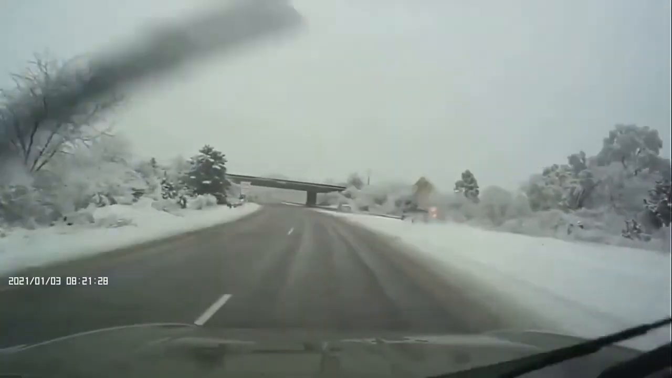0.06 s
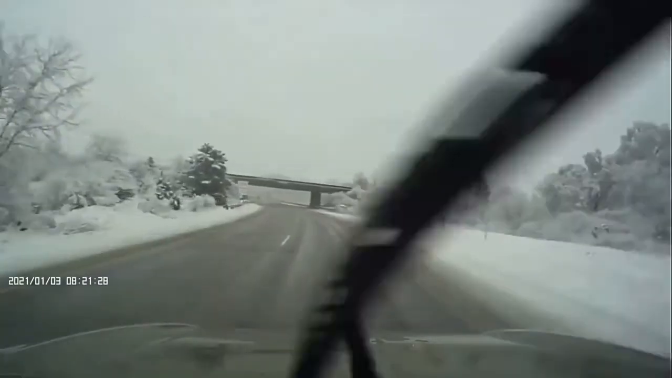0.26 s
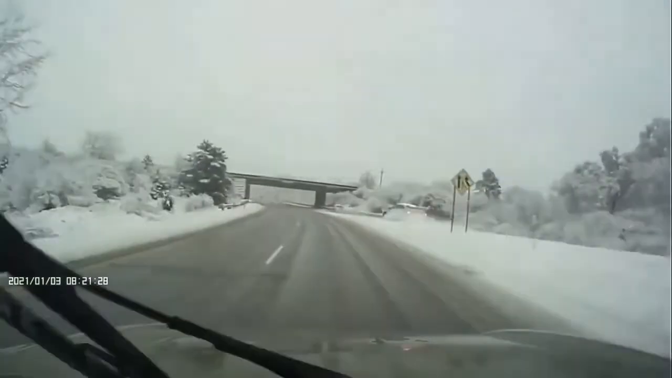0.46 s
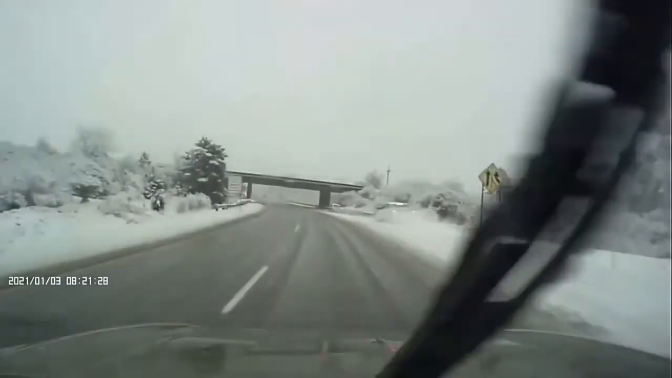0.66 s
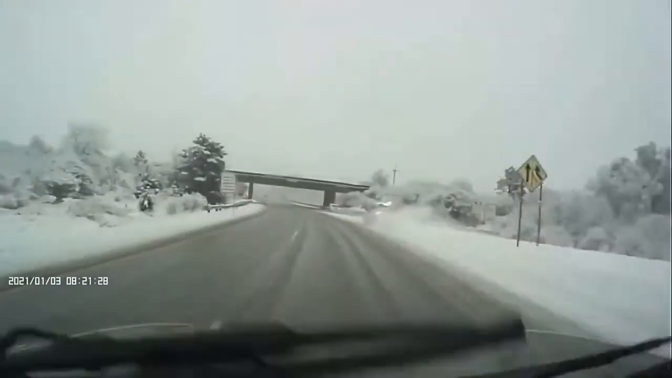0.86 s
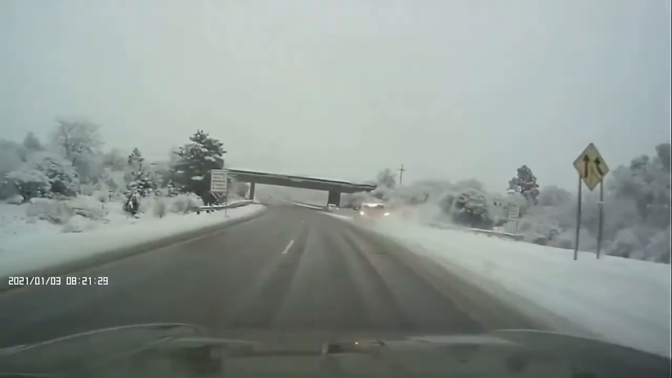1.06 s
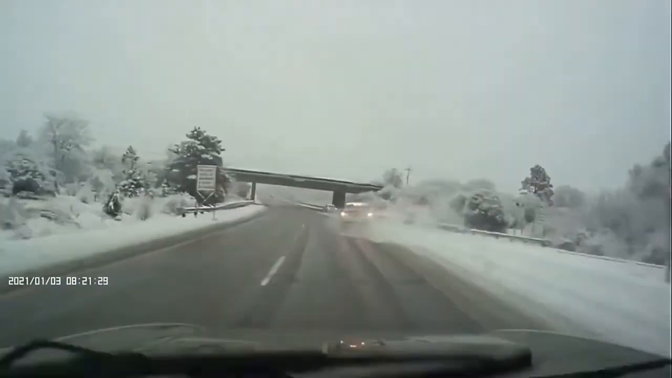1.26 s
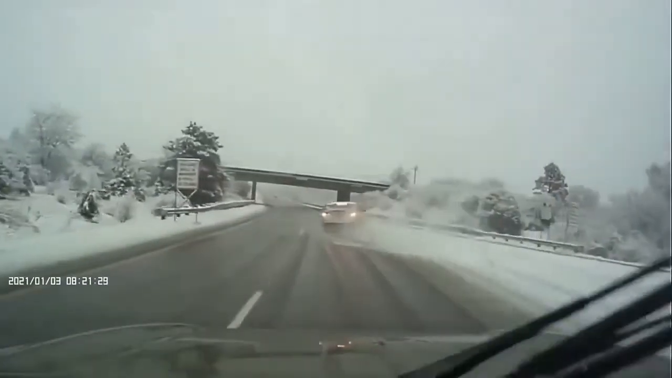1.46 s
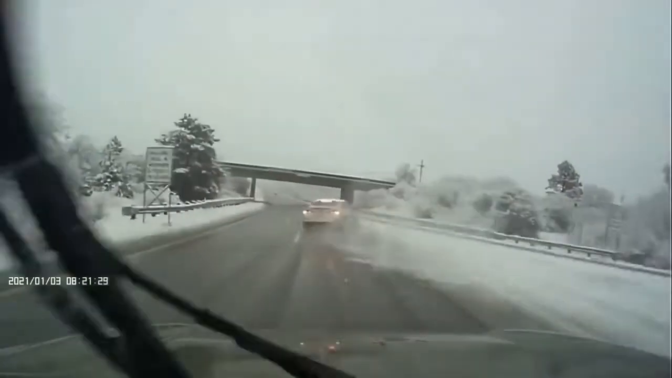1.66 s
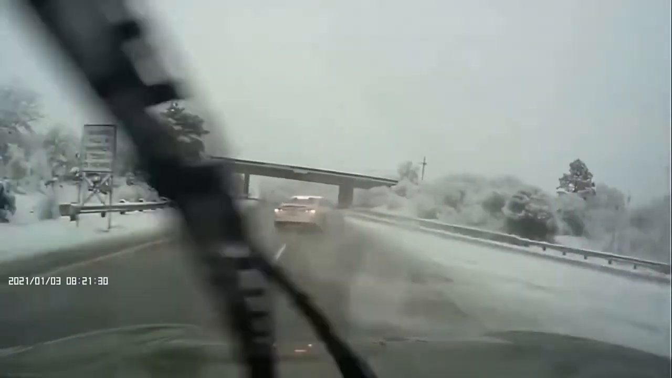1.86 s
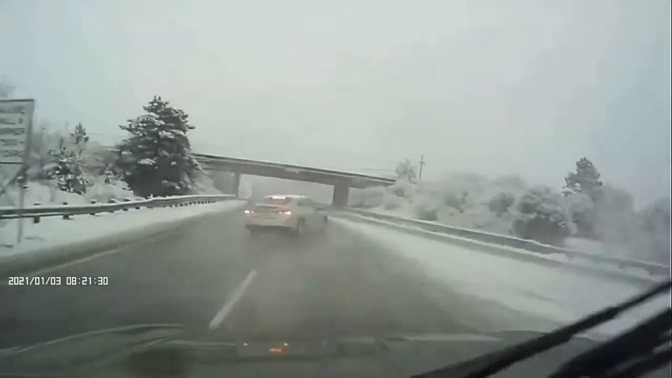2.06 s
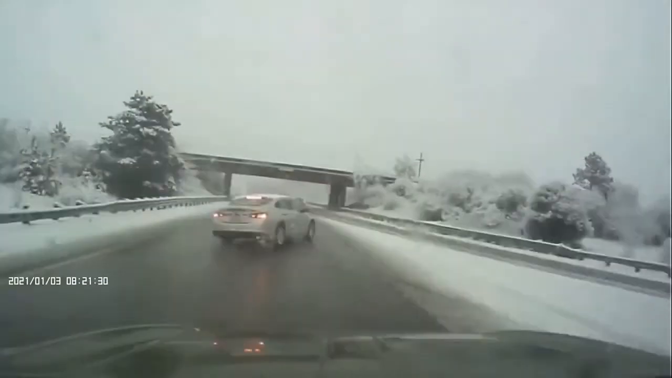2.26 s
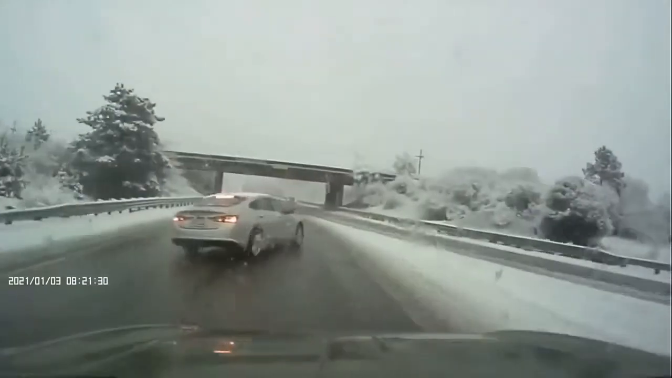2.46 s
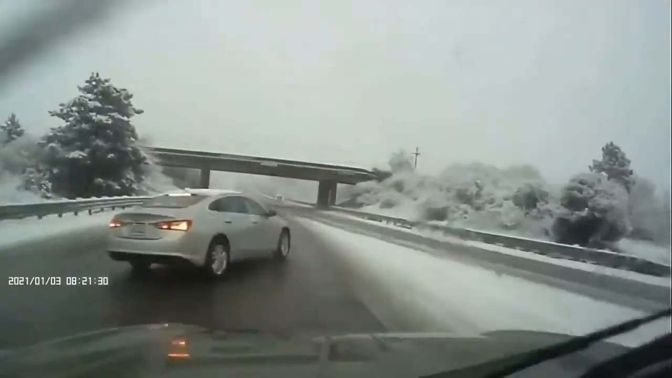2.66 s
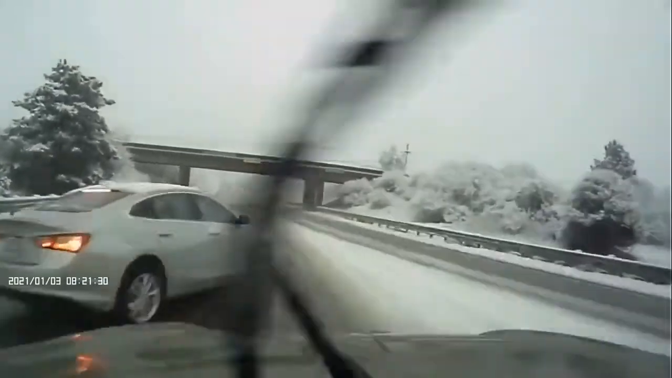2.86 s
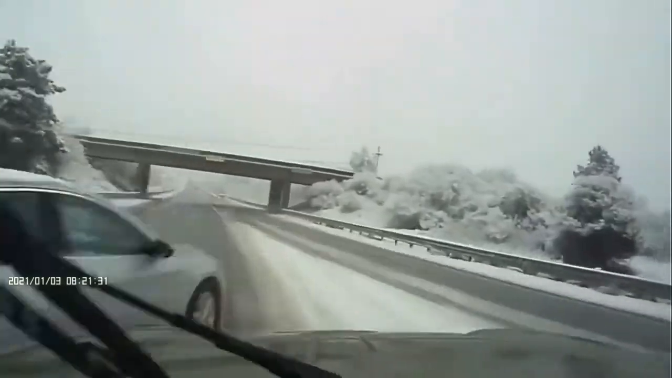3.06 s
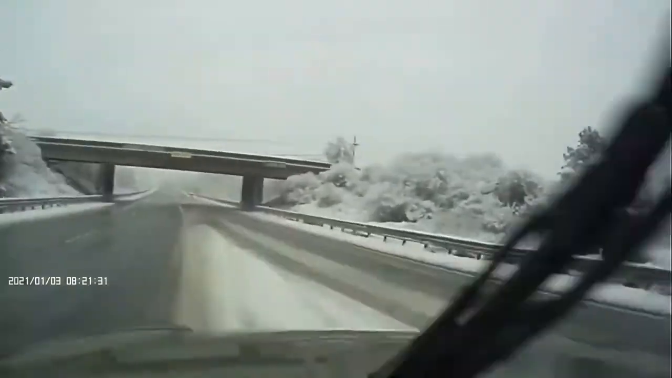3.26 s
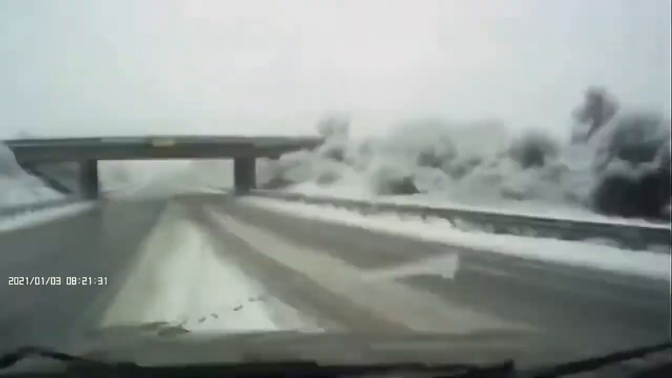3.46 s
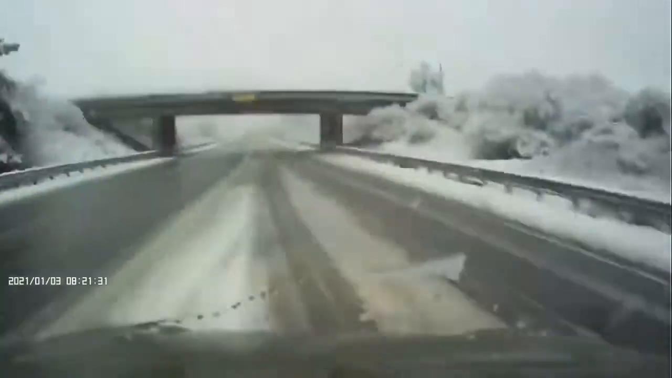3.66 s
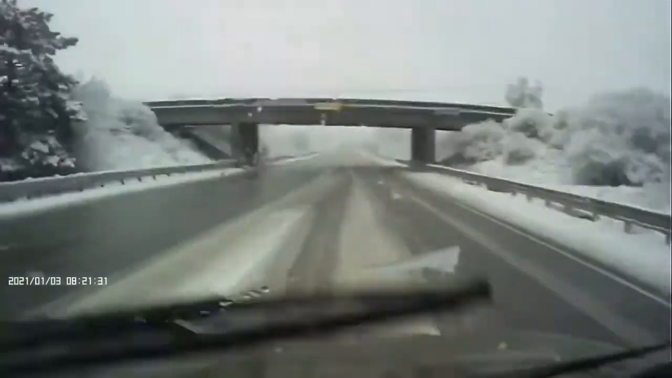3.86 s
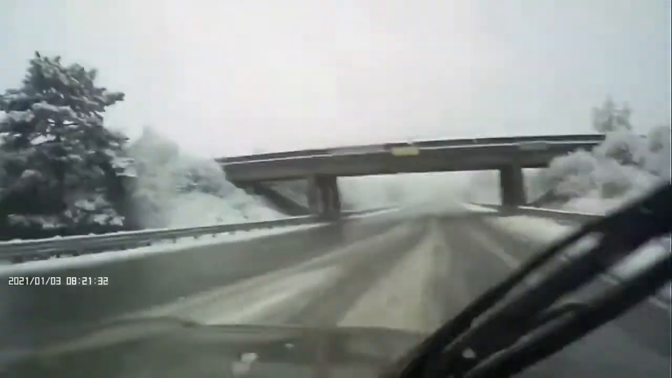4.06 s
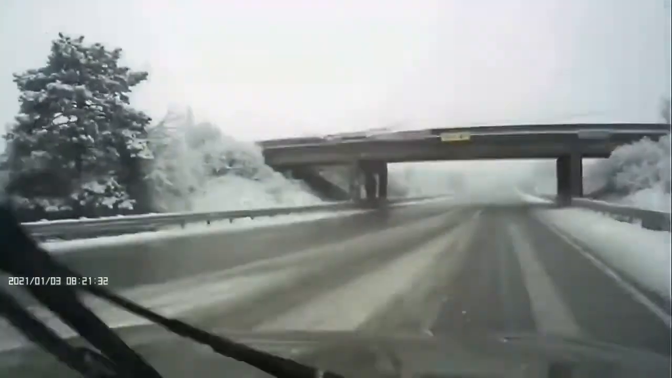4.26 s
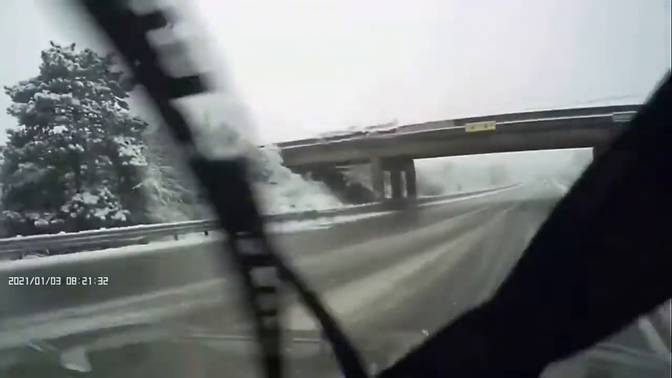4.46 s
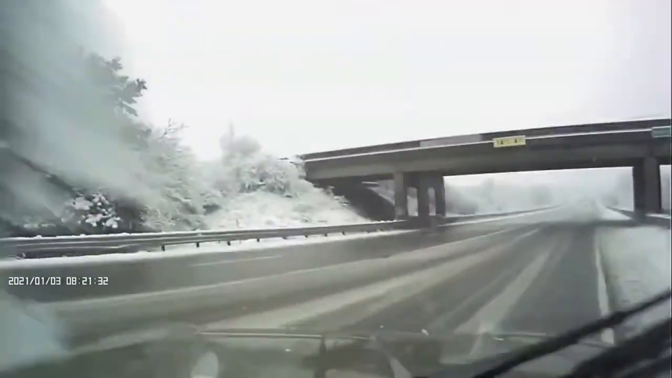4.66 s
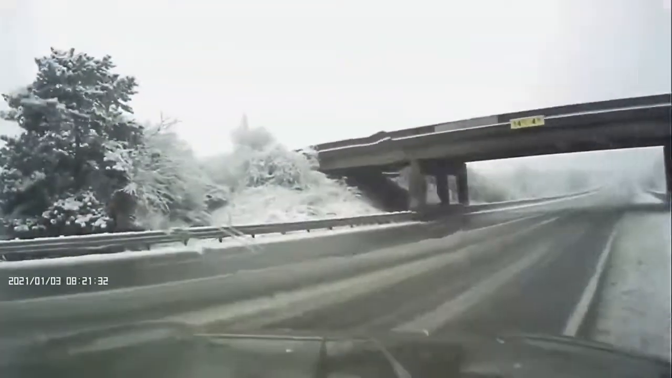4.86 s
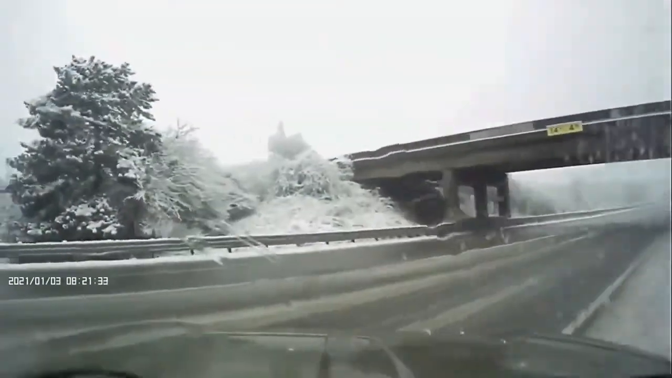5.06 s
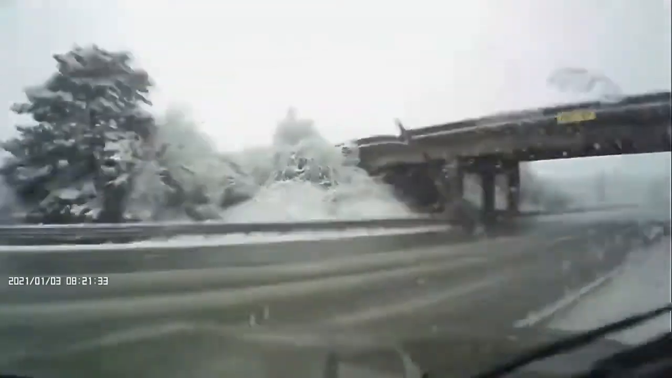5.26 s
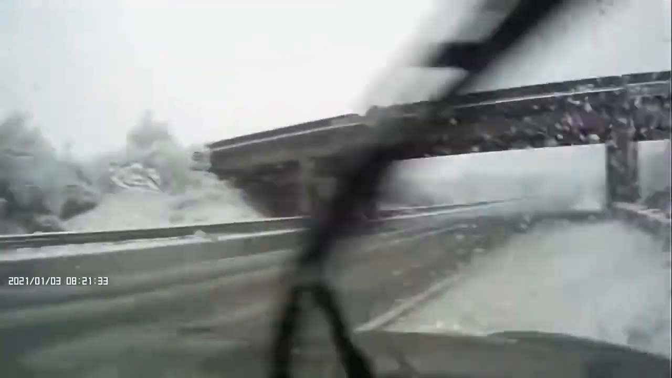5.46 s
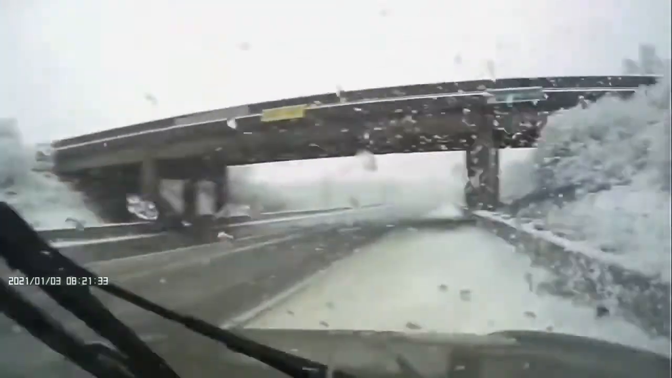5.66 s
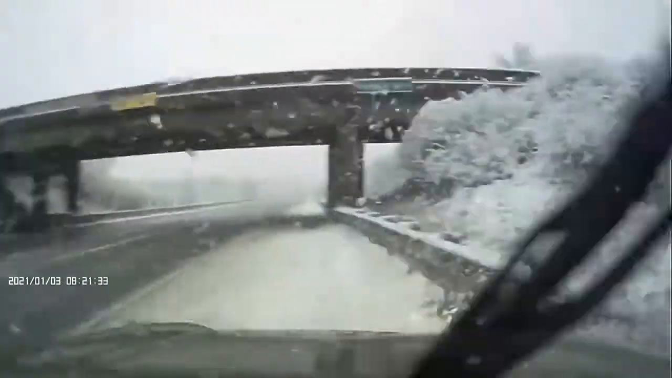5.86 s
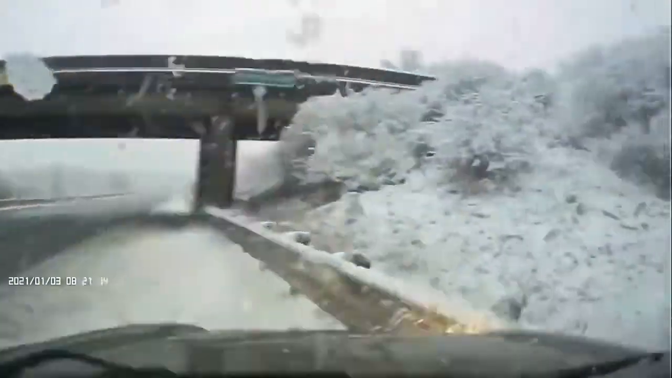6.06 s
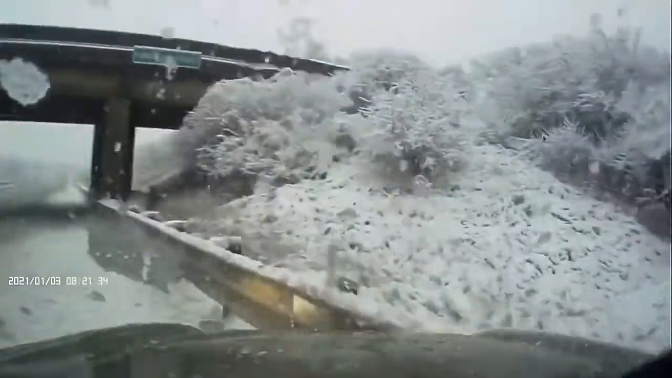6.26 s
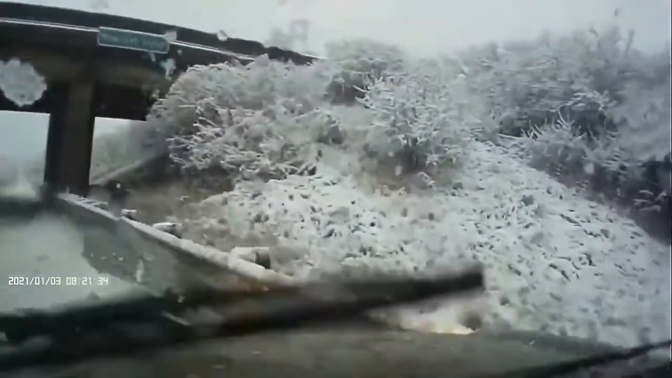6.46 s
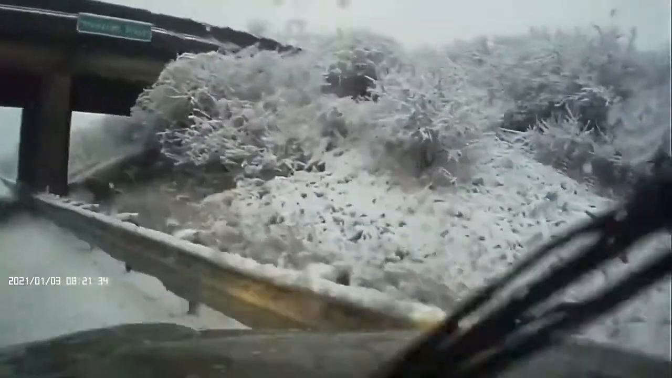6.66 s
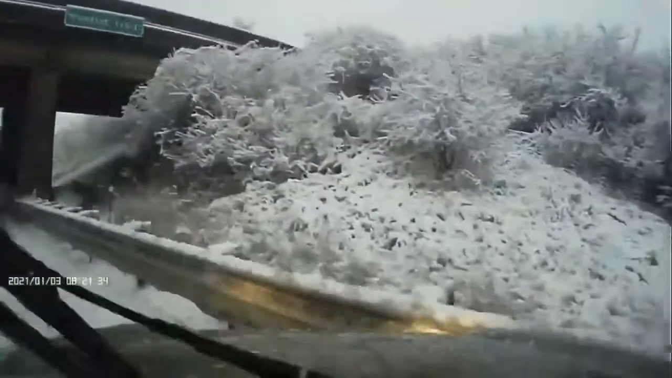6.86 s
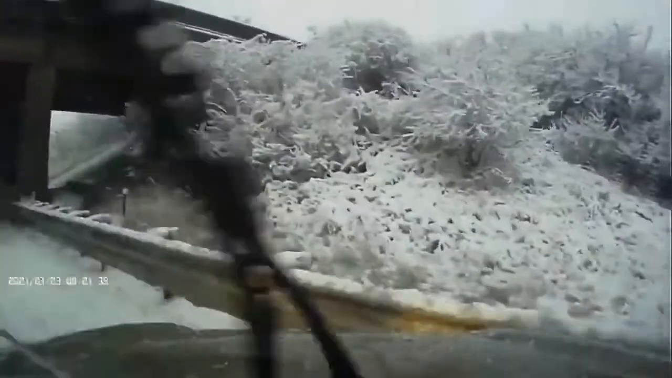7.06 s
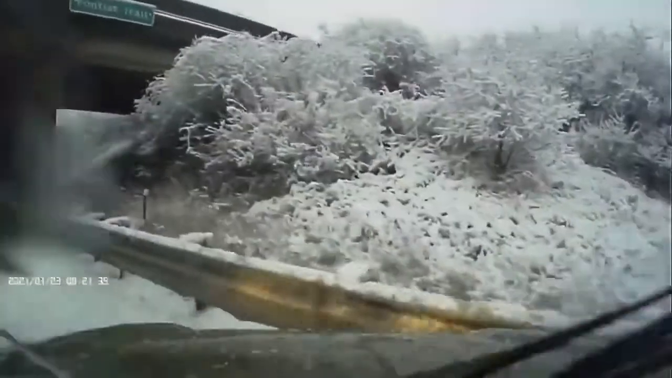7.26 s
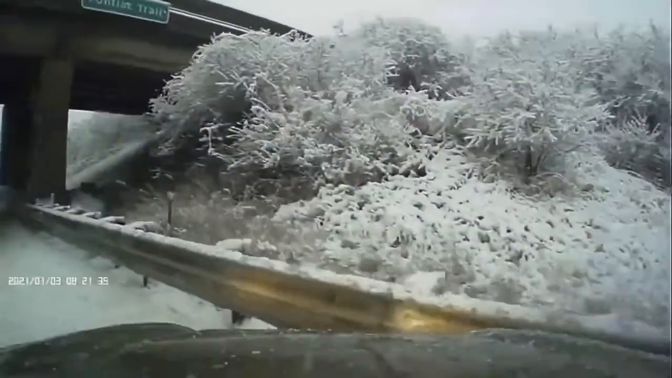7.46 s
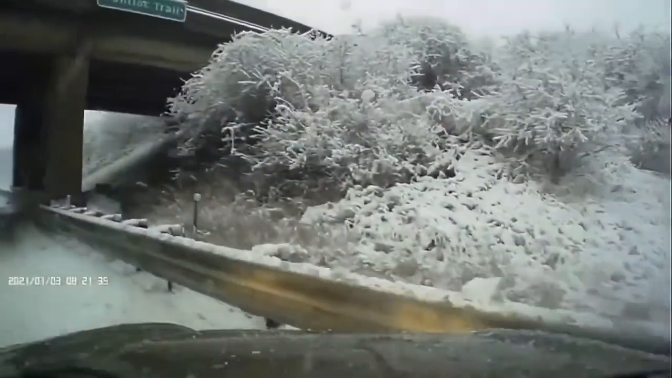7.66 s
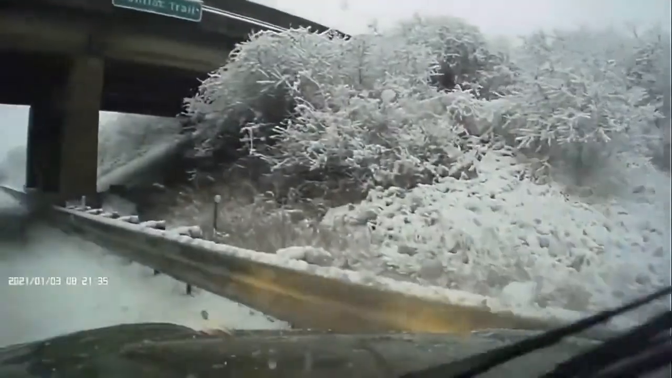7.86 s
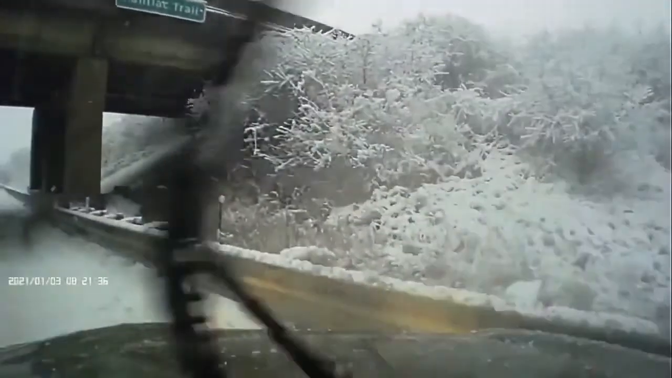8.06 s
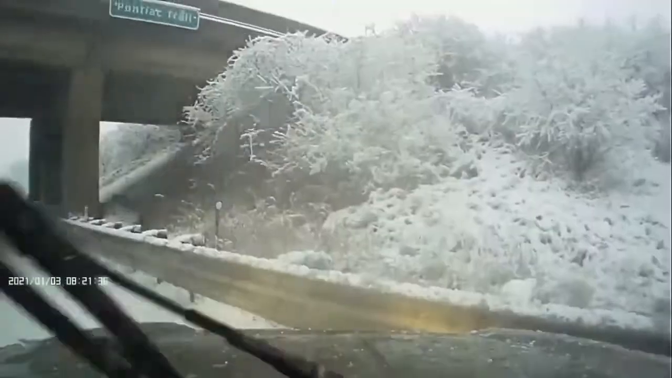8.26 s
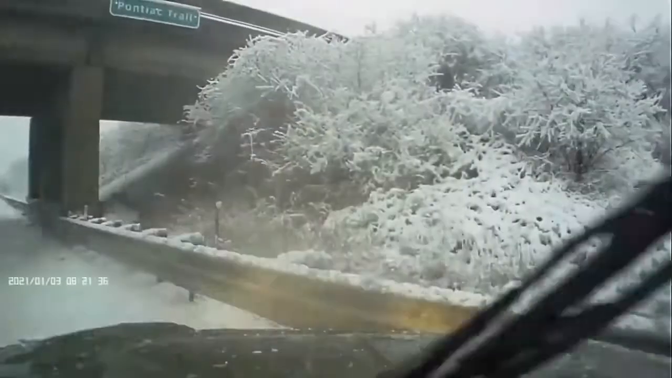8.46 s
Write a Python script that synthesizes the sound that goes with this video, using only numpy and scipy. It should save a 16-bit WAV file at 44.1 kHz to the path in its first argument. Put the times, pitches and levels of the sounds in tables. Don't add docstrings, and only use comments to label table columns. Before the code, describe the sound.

Steady muffled driving rumble breaks into a heavy distorted impact, grinding slide with loose rattles, second metal barrier crash, then near silence.

```python
import sys
import numpy as np
from scipy import signal
from scipy.fft import rfft, irfft, next_fast_len
from scipy.io import wavfile
from scipy.ndimage import uniform_filter1d, map_coordinates

SR = 44100
rng = np.random.default_rng(int(sys.argv[2]) if len(sys.argv) > 2 else 0)


def invert_db(x):
    u = np.asarray(x, float) / 20
    return 10 ** u


def bounce(signal):
    frames = np.transpose(np.atleast_2d(signal))
    limited = np.clip(frames, -1, 1)
    pcm = np.round(limited * 32767).astype(np.int16)
    wavfile.write(sys.argv[1], SR, pcm)


N = 375715

# start_s [s], sway_db [dB]
ROAD_SWAY = [(0.0, -30), (1.6, -31.5), (1.85, -28.5), (3.07, -34.5), (3.37, -29.5), (3.46, -37),
             (3.53, -15.5), (4.3, -16.5), (4.84, -27), (5.1, -24.5), (5.31, -25.5), (5.42, -13),
             (5.94, -32.5), (7.13, -27.5), (7.3, -32), (7.96, -29.5), (8.24, -42), (8.52, -49.5)]
# start_s [s], level_db [dB], pitch_hz [Hz], t60_s [s], sag_db [dB]
AIR_SHOVES = [(3.317, -11, 52, 0.28, -40), (3.519, -2.5, 60, .1, -29), (3.617, 9.5, 36.98, 0.68, 6.5),
              (3.806, -5.5, 38.9, 0.38, -30), (3.902, -4.5, 36.5, 0.42, -29), (4.035, -1, 42.6, 0.2, -9),
              (4.13, 3.5, 32.4, 0.14, -23.5), (4.29, 2, 34.5, 0.19, -29), (5.505, -10, 42, .25, -32),
              (5.582, -8, 44.9, .3, -29), (5.404, 2, 45.8, 0.19, -6), (6.686, -17, 64, .15, -50),
              (6.855, -19, 34.3, .2, -50), (7.092, -15, 36, .12, -50), (6.797, -19, 45, 0.088, -50),
              (7.145, -25, 68, .3, -50)]
# start_s [s], hold_s [s], level_db [dB], grit_db [dB re level], release [dB/s]
BODY_JOLTS = [(3.27, .01, -25.5, -4.5, 400), (3.501, 0.023, -20.5, -5, 202.5), (3.524, 0.13, -16, 0, 502),
              (3.688, 0.065, -16.5, 0, 202), (3.808, 0.012, -29, -6, 39), (4.089, 0.011, -17.5, -3.5, 229),
              (4.199, 0.35, -23.5, -3.5, 115.5), (4.692, 0.19, -26.5, -8, 68),
              (4.968, 0.031, -21, -18, 120), (5.136, 0.059, -35, -1, 97), (5.363, 0.042, -17.5, 2.5, 296),
              (5.454, 0.17, -27, 0, 118), (5.777, 0.029, -34, 2, 115), (6.193, 0.033, -27.5, -17, 172),
              (6.34, 0.076, -21, 0.5, 153), (6.533, 0.18, -39.5, -6.5, 47), (6.863, 0.17, -40.5, -3, 110),
              (7.252, 0.17, -51.5, 4, 86), (7.694, 0.028, -42, -22, 203)]
# start_s [s], drag_db [dB]
SNOW_DRAG = [(3.42, -42.5), (3.8, -37), (5.3, -49.5), (5.7, -34), (6.15, -44), (6.6, -43.5), (7.2, -49),
             (8.52, -50)]
# start_s [s], hold_s [s], level_db [dB], release [dB/s]
LOOSE_SHAKES = [(3.27, .012, -49, 700), (3.518, 0.25, -43.5, 500), (3.701, 0.02, -37, 497),
                (3.826, 0.035, -56, 42), (4.101, 0.02, -49, 400), (4.19, 0.13, -53.5, 202),
                (4.387, 0.16, -52, 292), (4.695, .09, -55, 403), (4.822, 0.04, -59.5, 200),
                (4.911, 0.12, -62.5, 146), (5.168, 0.068, -65.5, 102), (5.375, 0.028, -41, 500),
                (5.448, 0.084, -53.5, 46), (5.213, .022, -58.5, 502), (4.909, .015, -65, 500),
                (6.027, .018, -64, 400), (5.793, 0.027, -51.5, 135), (5.777, 0.01, -55, 112),
                (5.907, 0.02, -53, 350), (6.24, 0.0088, -72, 240), (6.37, 0.055, -52, 148),
                (6.498, 0.015, -55, 250), (6.547, 0.006, -40.5, 1500), (6.624, 0.33, -66.5, 83),
                (7.263, 0.049, -53.5, 500), (7.363, 0.031, -53.5, 218), (7.43, 0.045, -71.5, 38),
                (7.923, .02, -80, 120)]
# start_s [s], level_db [dB]
JINGLE_LEVEL = [(3.51, -67.5), (3.83, -60.5), (4.5, -68), (4.65, -75), (5.3, -78), (5.4, -73),
                (5.72, -61.5), (5.82, -52.5), (5.92, -80.5)]
JINGLE_MODES = [7500, 7900, 11100, 11700, 13800]
# start_s [s], peak_db [dB], thud_db [dB re
# peak], pitch_hz [Hz]
BODY_KNOCKS = [(3.273, -16, -20, 957), (3.516, -14, -9, 397), (3.537, -2.5, -6, 350),
               (3.564, -20, 6.5, 252), (3.679, -4, 16.5, 241), (3.702, 4.5, -2, 265),
               (3.736, -11, -18, 330), (3.759, -6.5, -1, 251), (3.814, -13.5, -13, 241),
               (3.864, -8, -23, 284), (3.946, -9.5, 10, 232), (4.021, -14.5, 8.5, 251),
               (4.099, -7, 2.5, 282), (4.203, -17, -6, 485), (4.27, -9, -5, 252), (4.293, -9.5, -8, 496),
               (4.326, -13.5, -10, 530), (4.379, -12, 8.5, 472), (4.489, -9.5, 7, 402),
               (4.52, -7.5, 1, 273), (4.559, -11, 4.5, 277), (4.636, -20, -12, 557),
               (4.708, -14.5, -3, 259), (4.749, -11.5, -9, 300), (4.777, -13, -3, 314),
               (4.837, -15.5, 0, 603), (4.938, -17, -16, 266), (4.985, -18.5, 15, 285),
               (5.142, -20, -14, 253),
               (5.374, -6.5, 0, 530), (5.388, 0.5, 0.5, 554), (5.432, -13, -12, 512),
                  (5.511, -7.5, 2.5, 572), (5.539, -9, -10, 252), (5.604, -9.5, -4, 399),
                  (5.697, -18.5, 0, 613), (5.787, -14.5, -20, 570), (5.897, -24.5, -13, 747),
                  (5.975, -28, -10, 230), (6.215, -43.5, 13, 231), (6.344, -20, -3, 525),
                  (6.379, -6.5, -5, 524), (6.417, -9.5, -12, 500), (6.933, -24, -15, 320),
                  (6.982, -21, -3, 273), (7.29, -24, -11, 964), (7.38, -30.5, -37, 923),
                  (7.682, -32, 5, 302), (7.741, -31.5, -12, 231), (7.92, -31.5, -14, 262)]
# start_s [s], peak_db [dB], pitch_hz [Hz]
PANEL_RAPS = [(3.558, -13, 736), (3.836, -23.5, 557), (3.865, -22, 840), (4.295, -13.5, 694),
              (4.323, -24, 530), (4.351, -21, 560), (4.435, -18.5, 498), (4.496, -12.5, 502),
              (4.827, -18, 463), (4.937, -21.5, 505), (5.064, -30, 495), (5.089, -27, 589),
              (5.433, -14, 580), (5.451, -11, 623), (5.488, -19, 620), (5.605, -16.5, 450),
              (6.298, -32, 738), (6.364, -14.5, 614), (6.404, -11, 883), (6.45, -21, 493), (6.55, -25, 795),
              (6.6, -36, 832), (6.799, -32.5, 764), (6.898, -31, 581), (7.188, -42, 630), (7.247, -36, 991),
              (7.265, -32, 937), (7.409, -28, 595)]
# pitch_hz [Hz], level_db [dB]
RAIL_MODES = [(1017, -25.5), (1174, -28.5), (2099, -39), (2422, -45), (3004, -45), (3400, -49), (3801, -48),
              (4124, -48), (4404, -43), (5150, -45), (5700, -46.5)]
# start_s [s], level_db [dB]
DOWNWARD_STEPS = [(3.634, -5), (3.651, 2), (3.6812, 0), (3.6872, 2), (3.7146, -3), (3.7402, 1), (3.7892, -6),
                  (4.0995, -4), (4.1073, 2), (4.2982, -12), (4.3272, -15), (4.4992, -11), (5.4152, -5),
                  (5.6092, -14), (5.9757, -16), (4.0412, -22), (3.9746, -22)]
# start_s [s], level_db [dB]
UPWARD_STEPS = [(3.6453, 2), (3.6763, 3), (3.6852, 4), (3.7272, -3), (3.7592, -1), (3.8092, -7), (4.1031, 0),
                (4.1206, -5)]
# start_s [s], level_db [dB], pitch_hz [Hz], t60_s [s], fall [octaves/s]
SPRING_TONES = [(4.094, 5, 116.2, .16, 0.5), (4.1197, -4, 116, 0.067, 1), (4.4, -13, 146, .15, -0.7),
                (4.988, -15, 480, 0.095, 1.5), (5.03, -13, 130, 0.065, 2), (4.018, -14.5, 744, 0.073, 0.5),
                (6.378, -7, 274.7, 0.202, -1), (6.412, -3, 270, 0.13, 0), (6.355, -15, 514, .12, -0.5),
                (3.273, -16.5, 340, 0.089, -2), (3.945, -7, 295, 0.1, 4), (6.985, -21, 490, 0.092, 19.5),
                (7.031, -11, 239, 0.064, 1), (7.515, -26, 362, 0.053, 12), (7.535, -39.5, 600, 0.27, .1),
                (7.625, -36, 605, 0.087, .1), (8.14, -40, 520, .08, .5), (8.46, -38, 330, 0.073, 0),
                (6.214, -19.5, 151, .12, .5), (6.56, -21, 250, .2, 1), (7.708, -19, 244, 0.095, 5.5),
                (8.08, -31.5, 758, 0.073, 0)]
# start_s [s], peak_db [dB], pitch_hz [Hz]
TRIM_TICKS = [(2.4, -45.5, 4190), (3.275, -36, 4270), (3.283, -44, 2840), (3.522, -29.5, 2610),
              (3.9086, -35, 4080), (3.926, -36.5, 2940), (4.1016, -31, 3020), (4.195, -40, 2610),
              (4.496, -34.5, 2590), (4.64, -47, 3130), (4.702, -39, 2870), (4.7454, -42.5, 2840),
              (5.159, -42, 4080), (5.1909, -36, 4220), (5.2152, -41, 3000), (5.371, -37, 3060),
              (5.5827, -36, 2930), (5.789, -43, 4430), (5.9114, -37, 2900), (6.0273, -43, 4750),
              (6.2325, -39.5, 4200), (6.387, -32.5, 4250), (6.549, -35, 2920), (6.899, -45, 2850),
              (6.897, -43, 1650), (6.985, -46, 1900), (7.95, -51, 2000), (6.36, -41, 3900),
              (7.34, -42.5, 4780), (7.369, -43, 2780), (7.406, -39, 2830), (7.639, -46.5, 2850),
              (7.954, -49, 2970),
              (4.113, -29.5, 2570), (4.3808, -39, 2220), (4.4517, -40, 2370), (4.5251, -36, 2570),
                  (4.6694, -52, 2370), (4.776, -44, 2220), (4.8284, -47, 2200), (4.8379, -44, 2380),
                  (4.8594, -48, 2750), (4.9177, -45.5, 4400), (4.9394, -47, 2350), (4.9876, -48, 4660),
                  (5.0305, -49, 2950), (5.1053, -56, 2240), (5.2274, -44, 2890), (5.4311, -37, 2210),
                  (5.5594, -42, 2950), (6.6278, -48, 2260), (6.6474, -53, 2290), (6.6824, -52, 2270),
                  (6.7264, -56, 2310), (6.7481, -54, 4670), (6.769, -53, 2220), (6.8319, -52, 3080),
                  (6.9326, -49, 2540), (6.9944, -57, 2250), (7.0399, -57, 2780), (7.0953, -55, 2230),
                  (7.2174, -57, 2590)]
# start_s [s], peak_db [dB]
GLASS_GRIT = [(.3681, -57), (1.4165, -49), (1.885, -46.5), (2.3106, -52), (2.6524, -56), (3.558, -28),
              (3.944, -31.5), (3.975, -34.5), (3.998, -51), (4.041, -35), (4.067, -38.5), (4.1658, -36),
              (4.097, -42), (4.287, -32.5), (4.298, -33), (4.314, -39), (4.376, -44.5), (4.414, -41),
              (4.55, -36), (5.1295, -46.5), (5.394, -25), (5.51, -40), (5.5327, -35.5), (5.8115, -44),
              (5.974, -38.5), (6.3437, -45.5), (7.1412, -51), (7.923, -54), (8.191, -53), (8.28, -50.5)]
# start_s [s], level_db [dB]
TRIM_CREAK = [
    (2.25, -83),
    (2.42, -69),
    (2.882, -86),
    (2.958, -72),
    (3.2, -77),
]
# start_s [s], hum_db [dB], roar_db [dB]
ROLLING = [
    (0.0, -34.5, -44),
    (3.25, -37, -46),
    (3.28, -29, -48),
    (3.32, -41, -43),
    (3.47, -39.5, -49.5),
    (3.5, -41, -47),
]
THIN_MOMENTS = [.18, .551, 1.225, 1.622, 1.645, 1.849, 1.991, 2.223, 2.456, 2.966, 3.132, 3.874, 3.897,
                4.153, 4.519, 4.986, 5.309, 5.477, 5.683, 6.147, 6.522, 5.575, 6.8, 6.82, 6.867, 6.983,
                7.076, 7.169, 8.423]

# pitch_hz [Hz], level_db [dB per Hz]
BOOM_SPECTRUM = [(12, -31), (25, -4.5), (38, -3.5), (55, -6), (75, -10), (100, -31.5), (200, -94.5),
                 (400, -120)]
FLOOR_SPECTRUM = [(50, -57), (85, 3), (120, 6), (160, 2), (200, -6), (300, -60.5), (800, -120)]
GRIND_SPECTRUM = [(120, -39.5), (200, 5.5), (270, 3.5), (350, -2.5), (450, -5.5), (650, -64.5),
                  (1500, -120)]
CRUNCH_SPECTRUM = [(300, -37.5), (480, 3), (650, 1), (900, -1), (1150, -13), (1500, -24.5), (2200, -35),
                   (3500, -54.5), (7000, -120)]
RATTLE_SPECTRUM = [(880, -17), (1500, 1), (2020, -5.5), (2520, -5), (2860, -0.5), (3400, -9), (4590, -5),
                   (5670, -10.5), (6610, -17), (7640, -14.5), (8660, -26.5), (14000, -27.5), (15000, -30.5)]
SNAP_SPECTRUM = [(4000, -74), (8000, 3.5), (10000, -2.5), (15500, -1.5), (17000, -64)]
CREAK_SPECTRUM = [(3000, -65), (3900, -17), (4200, -11), (4500, -18), (5500, -52.5), (9000, -120)]
HUM_SPECTRUM = [(140, -57.5), (200, -4.5), (235, -4), (270, 0.5), (310, -4), (350, -21.5), (450, -75),
                (900, -120)]
ROAR_SPECTRUM = [(210, -23.5), (360, -1.5), (423, -8.5), (493, -2), (596, -8), (786, -7.5), (1240, -25),
                 (1390, -26), (2150, -39.5), (3500, -50), (4550, -83), (7700, -120)]
HISS_SPECTRUM = [(1470, -27), (2500, 1.5), (5290, -2.5), (5580, -2.5), (6320, -3), (14200, -6.5),
                 (15300, -8), (15900, -22)]

JOLT_RISE_S, SHAKE_RISE_S = 0.014, 0.0022


def unit(x):
    return x / np.sqrt(np.mean(x ** 2) + 1e-20)


def curves(rows):
    s, *cols = np.transpose(rows)
    s = np.r_[s[0] - .1, s, s[-1] + .1]
    return [np.interp(np.arange(N) / SR, s, np.r_[-120, c, -120]) for c in cols]


def wobble(rate):
    knots = rng.standard_normal(int(N * rate / SR) + 4)
    return map_coordinates(knots, [np.arange(N) * rate / SR])


def coloured(x, spectrum):
    m, size = 2 ** 15, next_fast_len(N)
    f, v = np.transpose(spectrum)
    level_db = np.interp(np.log(np.fft.rfftfreq(m, 1 / SR) + 1), np.log(f + 1), v)
    cep = irfft(np.log(invert_db(level_db) + 1e-6), m)
    cep[1:m // 2] *= 2
    cep[m // 2 + 1:] = 0
    impulse = irfft(np.exp(rfft(cep)), m)
    return irfft(rfft(x, size) * rfft(impulse, size), size)[:N]


def noise(spectrum, lumps=0.):
    return unit(coloured(rng.standard_normal(N) * invert_db(lumps), spectrum))


def bursts(s, db, t60, attack):
    env, t = np.zeros(N + SR), np.arange(SR // 4) / SR
    shape = invert_db(-60 * t / t60) * (1 - np.exp(-t / attack))
    for at, level in zip(s, db):
        env[round(at * SR):][:len(t)] += invert_db(level) * shape
    return env[:N]


def rings(s, db, hz, t60, attack=1e-5):
    x, t = np.zeros(N + SR), np.arange(round(1.2 * t60 * SR)) / SR
    for at, level, pitch in zip(s, db, hz):
        envelope = invert_db(level - 60 * t / t60) * (1 - np.exp(-t / attack))
        x[round(at * SR):][:len(t)] += envelope * np.sin(2 * np.pi * pitch * t)
    return x[:N]


def swells(s, hold, db, release, rise):
    env, t = np.zeros(N + SR), np.arange(SR) / SR
    for at, held, level, fall in zip(s, hold, db, release):
        decay = invert_db(level - abs(fall) * np.maximum(t - held, 0))
        env[round(at * SR):][:SR] += decay * (1 - np.exp(-t / rise))
    return env[:N]


def cabin():
    sway_db, = curves(ROAD_SWAY)
    s, hold, db, grit_db, release = np.transpose(BODY_JOLTS)
    floor = invert_db(sway_db - 10) + swells(s, hold, db - 1, release, JOLT_RISE_S)
    boom = invert_db(sway_db + 1.7) * noise(BOOM_SPECTRUM, 0.42 * wobble(16))
    x = boom + floor * noise(FLOOR_SPECTRUM, 1.6 * wobble(15))
    t = np.arange(SR) / SR
    for s, db, hz, t60, sag_db in AIR_SHOVES:
        swing = invert_db(db - 60 * t / t60) * np.sin(2 * np.pi * hz * t) * (1 - np.exp(-t / 0.0075))
        sag = invert_db(sag_db) * t / 0.091 * np.exp(1 - t / 0.045)
        x[round(s * SR):][:SR] += swing - sag
    return x


def knocks():
    s, db, low_db, hz = np.transpose(BODY_KNOCKS)
    shake = bursts(s, db - 7.5, t60=0.057, attack=0.0005) * noise(CRUNCH_SPECTRUM)
    ring = rings(s, db - 2.5, hz, t60=0.064, attack=.0006)
    low = unit(noise(GRIND_SPECTRUM) + 1.48 * noise(FLOOR_SPECTRUM))
    return shake + ring + bursts(s, db + low_db - 1.5, t60=0.08, attack=0.0071) * low


def slide():
    drag_db, = curves(SNOW_DRAG)
    s, hold, db, grit_db, release = np.transpose(BODY_JOLTS)
    dig = invert_db(drag_db - 2.5) + swells(s, hold, db, release, JOLT_RISE_S)
    grit = invert_db(drag_db - 3.5) + swells(s, hold, db + grit_db, release, JOLT_RISE_S)
    shake = invert_db(drag_db - 30.0) + swells(*np.transpose(LOOSE_SHAKES), SHAKE_RISE_S)
    jerk = wobble(28)
    grind = noise(GRIND_SPECTRUM, 2.6 * jerk + 1.4 * wobble(40))
    crunch = noise(CRUNCH_SPECTRUM, 0.87 * jerk + 2.5 * wobble(90))
    rattle = noise(RATTLE_SPECTRUM, 0.37 * jerk + 2.3 * wobble(70) + 2.9 * wobble(300))
    jingling = invert_db(curves(JINGLE_LEVEL)[0] - 9.0) * jingle()
    return dig * grind + invert_db(-2.5) * grit * crunch + invert_db(0.5) * shake * rattle + jingling


def jingle():
    when, size, pitch = rng.random((260, 3)).T
    mode_hz = np.array(JINGLE_MODES)[(pitch * len(JINGLE_MODES)).astype(int)]
    part_hz = mode_hz * (1 + 0.3 * (.5 - when * 37 % 1))
    tones = unit(rings(3.0 + 3.1 * when, 16 * size, part_hz, t60=0.1))
    return tones * 1.14 + noise(SNAP_SPECTRUM, 4.9 * wobble(22) + 1.5 * wobble(400))


def clumps():
    s, hold, db, grit_db, release = np.transpose(BODY_JOLTS)
    grit = swells(s, hold, db + grit_db, release, JOLT_RISE_S)
    middle_hz, spread_octaves = 541, .33
    when, size, pitch = rng.random((800, 3)).T
    hz = middle_hz * 2. ** (spread_octaves * 4 * (pitch - .5))
    lumps = rings(3.2 + 4.6 * when, 9 * size, hz, t60=0.039, attack=.002)
    return invert_db(-5) * grit * unit(lumps)


def barrier():
    s, db, hz = np.transpose(PANEL_RAPS)
    raps = rings(s, db + 0.5, hz, t60=0.046, attack=0.0011)
    raps = raps + bursts(s, db - 8.5, t60=.02, attack=0.00033) * noise(CRUNCH_SPECTRUM)
    hz, db = np.transpose(RAIL_MODES)
    rail = rings(5.787 + 0 * hz, db, hz, t60=0.14, attack=0.0043)
    pops = bursts(*np.transpose(DOWNWARD_STEPS), t60=0.038, attack=0.00018)
    pops = pops - bursts(*np.transpose(UPWARD_STEPS), t60=0.029, attack=.0002)
    return raps + rail - uniform_filter1d(uniform_filter1d(pops, size=11), size=7)


def settling():
    x, t = np.zeros(N + SR), np.arange(SR // 4) / SR
    for s, db, hz, t60, fall in SPRING_TONES:
        phase = 2 * np.pi * np.cumsum(hz * np.maximum(2. ** (-fall * t), .5)) / SR
        envelope = invert_db(db - 60 * t / t60) * (1 - np.exp(-t / 0.0053))
        x[round(s * SR):][:len(t)] += envelope * np.sin(phase)
    return x[:N]


def ticks():
    rows = [(s, db, 2750, -9) for s, db in GLASS_GRIT]
    rows += [(*row, -24) for row in TRIM_TICKS]
    s, db, hz, bright_db = np.transpose(rows)
    crack = bursts(s, db - 2.5, t60=0.015, attack=0.00097) * noise(RATTLE_SPECTRUM)
    snap = bursts(s, db + bright_db + 3, t60=0.0037, attack=.0001) * noise(SNAP_SPECTRUM)
    ring_db = db - 5 - 1.2 * np.maximum(bright_db + 24, 0)
    ring = rings(s, ring_db, hz, t60=.018)
    creak = invert_db(curves(TRIM_CREAK)[0] - 1.5) * noise(CREAK_SPECTRUM, 5.5 * wobble(50))
    return ring + crack + snap + creak


def tyres():
    hum_db, roar_db = curves(ROLLING)
    wheel_hz = 12.5 * (1 + 0.013 * wobble(3.1))
    turn = 2 * np.pi * np.cumsum(wheel_hz) / SR
    hum = noise(HUM_SPECTRUM, 1.1 * np.cos(turn) + 0.35 * wobble(21))
    roar = noise(ROAR_SPECTRUM, .7 * wobble(15))
    return invert_db(hum_db) * hum + invert_db(roar_db) * roar


def scene():
    body = cabin() + knocks() + slide() + clumps()
    return (body + barrier() + settling() + ticks() + tyres())[None]


def clip(x, top, hard):
    return x / (1 + np.abs(x / top) ** hard) ** (1 / hard)


def thin_treble(x, keep_db, edge_hz):
    size = 1250
    out, window, hz = x.copy(), signal.windows.tukey(size, .4), np.fft.rfftfreq(size, 1 / SR)
    treble = hz > edge_hz
    for s in THIN_MOMENTS:
        part = slice(round(s * SR) - size // 2, round(s * SR) + size // 2)
        z = rfft(x[:, part] * window) * treble
        weight = np.abs(z) * np.sqrt(hz)
        weak = weight < invert_db(keep_db) * weight[:, treble & (hz < 7000)].mean()
        out[:, part] -= irfft(z * weak, size)
    return out


def band_limit(x):
    return signal.sosfilt(signal.butter(12, 16000, fs=SR, output="sos"), x)


def record(dry):
    x = np.where(dry < 0, clip(dry, top=.68, hard=6.), clip(dry, top=1.1, hard=9.))
    droop_hz = 7.
    x = signal.lfilter([1, -1], [1, -np.exp(-2 * np.pi * droop_hz / SR)], x)
    x = clip(x, top=.735, hard=16.)
    x = x + invert_db(-72.5) * noise(HISS_SPECTRUM)
    fade_in = np.minimum(.35 + np.arange(N) / (.02 * SR), 1)
    return band_limit(x * fade_in)


dry = scene()
out = record(dry)
bounce(out)
```